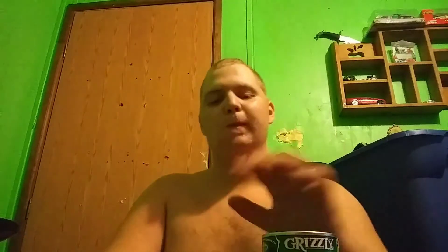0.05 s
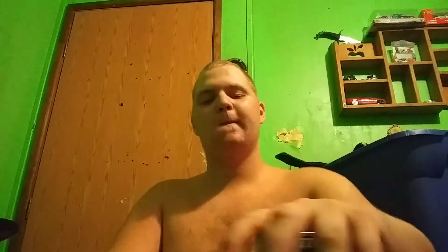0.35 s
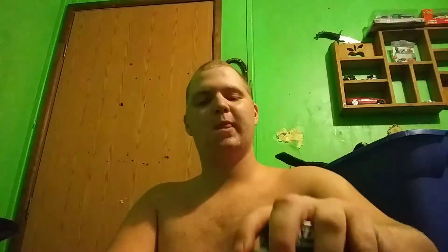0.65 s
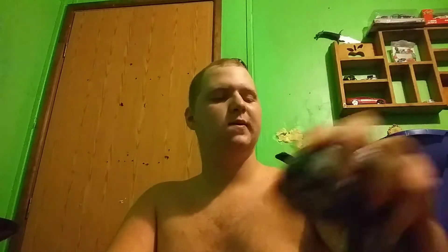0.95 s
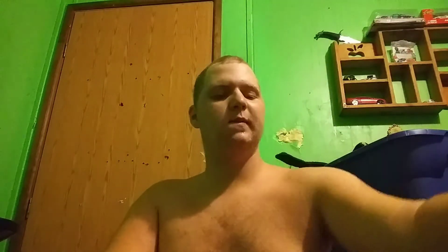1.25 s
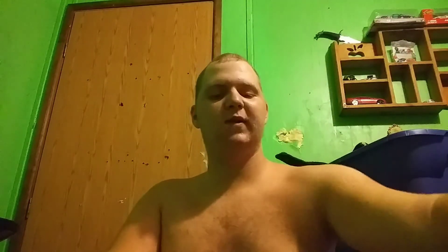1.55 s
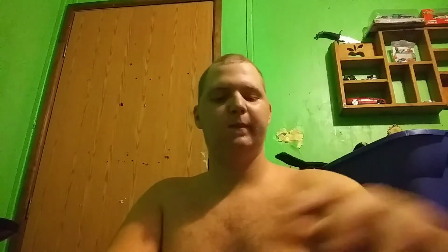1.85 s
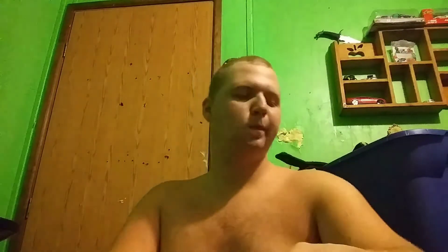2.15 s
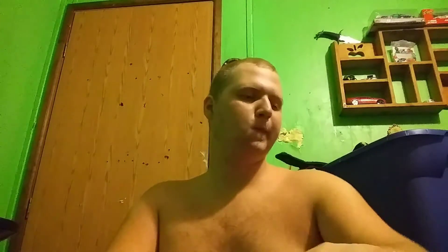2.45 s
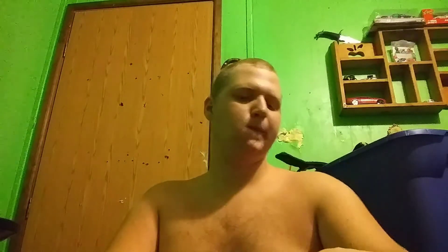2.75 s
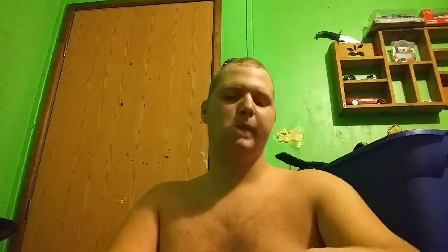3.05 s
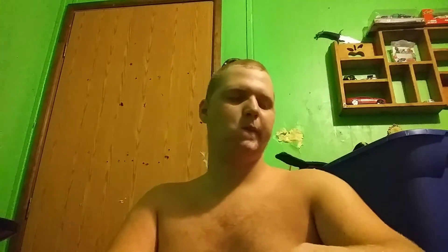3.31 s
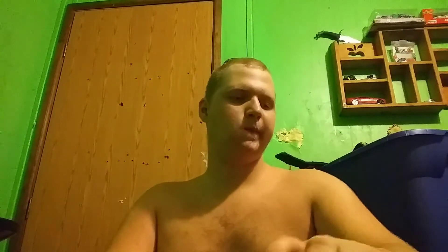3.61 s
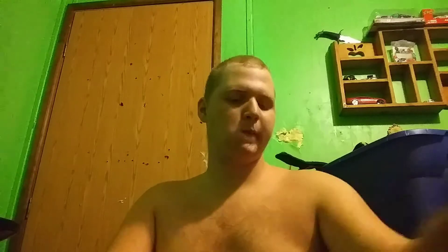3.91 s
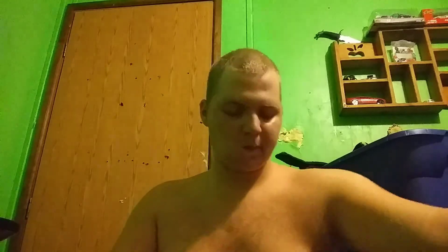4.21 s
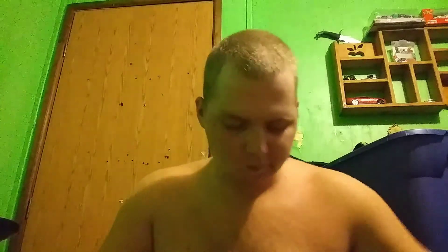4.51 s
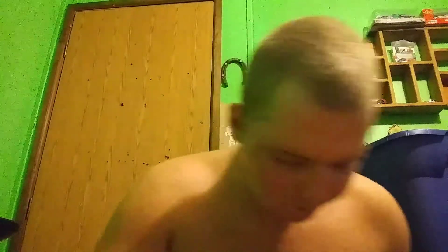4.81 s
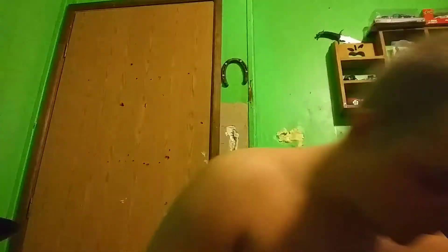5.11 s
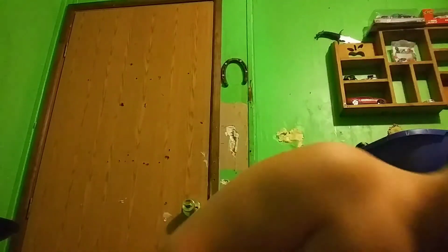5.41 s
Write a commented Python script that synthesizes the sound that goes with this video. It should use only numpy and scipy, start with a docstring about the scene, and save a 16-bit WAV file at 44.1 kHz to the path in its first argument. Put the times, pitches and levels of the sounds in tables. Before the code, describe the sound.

A small tin can is handled on a desk right next to the microphone in a small room. A sharp knock opens, then comes a quick, loud clatter of tinny clicks and scuffs with dull desk thumps. After a few softer taps, the can slides faintly and clicks down. One very hard knock follows later, and then someone shifts with a soft rustle over faint hiss.

```python
"""At a desk in a small room, close to a microphone, a small tin can is knocked about, lifted and set down.
Each impact excites damped modes of its wall and lid, and the desk thumps under the can and the hand.
Friction sounds as fingers rub the can and, once, as it slides across the top. The hardest knocks
overload the recorder; between them are faint hiss and the rustle of someone shifting."""
import sys
import numpy as np
from scipy import signal
from scipy.fft import rfft, irfft
from scipy.io import wavfile
from scipy.ndimage import uniform_filter1d

SR = 44100
rng = np.random.default_rng(int(sys.argv[2]) if len(sys.argv) > 2 else 0)


def transcribe(u):
    """Save the signal u as a 16-bit wav file named by the first command-line argument.

    u: samples, shape (n,) or (channels, n), limited to [-1, 1]; the rate is SR.
    q: integer samples, one column per channel.
    """
    v = np.clip(np.atleast_2d(u).T, -1, 1)
    q = np.round(v * 32767).astype(np.int16)
    wavfile.write(sys.argv[1], SR, q)


N = 240992
TIME = np.arange(N) / SR


# Impacts of the can:
# (time [s], relative level [dB], bass [dB], treble [dB], wall resonance [Hz], room send [dB])
KNOCKS = [ (0.068, 0.5, 9, -3.5, 685, -9.5), (0.085, -2.5, -4, -9, 1076, -6),
          (0.182, -31.5, 5, -7.5, 646, -9), (0.228, -28, -12, -2.5, 1090, -8),
          (0.502, -1.5, -4, 7.5, 1404, 4), (0.671, 2, -5, 3.5, 800, 2.5), (0.791, -1, -9.5, 2.5, 1040, 3),
          (0.800, -4.5, -28, 0, 770, 3.5), (0.809, 6, -5.5, 1, 1330, -25),
          (0.821, -3.5, 3, 2.5, 917.4, 1.5), (0.856, -5, 6.5, -3.5, 1228, 0),
          (0.901, -13.5, 1, -15, 990, -3), (0.912, 0.5, -7, -1.5, 1080, -8), (0.925, -5, 0, -13, 946, -3),
          (0.944, -5, -2, -10, 1080, -10.5), (1.163, 1, -3, -11, 962, -7),
          (1.354, -24.5, -3, -11, 2320, -5.5), (1.3746, -15.5, 6.5, -6, 1500, -7.5),
          (1.928, -23, 14, -9, 1600, -5.5), (1.959, -38, 9, 9.5, 2400, -8.5),
          (2.795, -11, -6.5, -8.5, 946, -11.5), (2.805, -12, -7.5, -1.5, 970, -13.5),
          (3.7149, -8, -13, -8, 1099, -1.5), (3.7455, 7, -5, -37, 1435, -13),
          (3.748, 10, 2.5, -1.5, 1498, -7.5), (3.844, -12.5, -4.5, -7.5, 1200, -8),
          (3.897, -23.5, 13.5, -8.5, 1000, -16)]

def knocks(skid_s=0.0058, chatter_s=0.0067, chatter_db=-5, touch_db=-3):
    """Impact excitation: a touch, a skid and lid chatter sum to one force. Yields (time, sound, send)."""
    t = TIME[:8192]
    for start, db, bass_db, treble_db, wall_hz, room_db in KNOCKS:
        skid = slips(len(t), spread_db=4) * np.exp(-t / skid_s)
        chatter = rng.standard_normal(len(t)) * np.sqrt(t) * np.exp(-2 * t / chatter_s)
        force = unit_energy(skid) + gain_of(chatter_db) * unit_energy(chatter)
        force[0] += gain_of(touch_db)
        pulse = contact_pulse(bass_db, treble_db, wall_hz)
        yield start, gain_of(db) * signal.fftconvolve(force, pulse), room_db


# Brief drags of the can or hand:
# (time [s], relative level [dB], bass [dB], treble [dB], wall resonance [Hz], decay time [s])
SCUFFS = [ (0.002, -16.5, 7, 7, 1010, 0.03), (0.037, -16, 11.5, -17, 650, .025),
          (0.151, -28.5, 0, 1.5, 960, .022), (0.470, 0, -2.5, 5, 1260, .024),
          (0.678, 2.5, 0, 14.5, 763, .021), (2.327, -33, 11.5, 2.5, 800, 0.017),
          (2.722, -25, 11.5, -23, 920, .056), (2.789, -9, -7, -0.5, 1004, 0.0096),
          (3.027, -32, 22, 10, 1070, 0.06), (3.85, -15.5, 6.5, -5.5, 1046, 0.01),
          (4.576, -32, 17.5, 20, 676, .011), (5.034, -30.5, 20, 3.5, 760, 0.012),
          (5.324, -44.5, 12, -19, 423, 0.037), (5.37, -40.5, -7, -10, 2450, 0.011)]

def scuffs(rise_share=0.092, room_db=1.5):
    """Transient friction: a burst of slips swells and decays. Yields (time, sound, send)."""
    t = TIME[:8192]
    for start, db, bass_db, treble_db, wall_hz, decay_s in SCUFFS:
        envelope = (1 - np.exp(-t / (rise_share * decay_s))) * np.exp(-t / decay_s)
        force = unit_energy(slips(len(t), spread_db=4) * envelope)
        pulse = contact_pulse(bass_db, treble_db, wall_hz, lid_hz=wall_hz)  # dragging sharpens the ring
        yield start, gain_of(db) * signal.fftconvolve(force, pulse), room_db


# Spectrum of a contact: (frequency [Hz], relative level [dB])
CONTACT_SPECTRUM = [(30, -23), (100, -16.5), (250, -11), (500, -2), (900, -2.5), (1500, -1), (2200, -5),
                    (3500, -11), (5500, -16), (7000, -22), (8500, -36.5), (12000, -48.5), (16000, -57.5)]

def contact_pulse(bass_db, treble_db, wall_hz, lid_hz=2665, wall_db=10, lid_db=3, delay_s=0.001097):
    """Dispersion: bending waves in thin sheet travel faster at high frequency, spreading the click."""
    size = 4096
    signed_hz = np.fft.fftfreq(size, 1 / SR)
    hz = abs(signed_hz) + 1
    db = value_at(CONTACT_SPECTRUM, hz)
    db += bass_db / (1 + (hz / 420) ** 4) + treble_db / (1 + (2600 / hz) ** 4)
    db += wall_db / (1 + (np.log2(hz / wall_hz) / 0.35) ** 2)  # half-widths in octaves
    db += lid_db / (1 + (np.log2(hz / lid_hz) / 0.086) ** 2)
    log_spectrum = np.conj(signal.hilbert(np.log(gain_of(db))))  # minimum phase keeps the pulse causal
    lag = 4 * np.pi * delay_s * np.sign(signed_hz) * np.sqrt(hz * wall_hz)
    pulse = np.fft.ifft(np.exp(log_spectrum - 1j * lag)).real[:size // 2]
    return pulse / abs(pulse).max()


# Modes of the can and the desk under it: (frequency [Hz], relative level [dB], 60 dB decay time [s])
CAN_MODES = [(146, -36, 0.73), (266, -28.5, 0.17), (334, -33, 0.3), (377, -32.5, 0.17), (553, -26, 0.14),
             (670, -28, 0.16), (762, -28.5, 0.012), (934, -25.5, 0.26), (1040, -31.5, 0.12),
             (1215, -31, 0.028), (1210, -36.5, 0.015), (1414, -29, 0.085), (1668, -27, 0.16),
             (1650, -27, 0.012), (2210, -28.5, .07), (2400, -26, 0.3), (2503, -23, 0.12),
             (2950, -30, 0.012), (3200, -20, 0.02)]

def can(contacts, ring_db=-28):
    """Modal superposition: each contact is heard directly and through the damped modes it excites."""
    t = TIME[:SR // 2]
    response = gain_of(ring_db) * sum(gain_of(db - 60 * t / t60) * np.cos(2 * np.pi * hz * t)
                                      for hz, db, t60 in CAN_MODES)
    response[0] += 1
    return signal.fftconvolve(contacts, response)[:N]


# Pushes of the hand on the desk: (time [s], level [dB], initial frequency [Hz], final frequency [Hz])
HAND_BUMPS = [(0.087, -23, 172, 162), (0.679, -29.5, 129, 115), (0.965, -28.5, 361, 333),
              (1.385, -37, 446, 442), (1.571, -47, 113.2, 100.3), (1.726, -48.5, 271.7, 257),
              (1.78, -47, 428, 424), (1.994, -47, 107, 100), (2.327, -35, 203, 116),
              (2.977, -34.5, 195, 126), (3.05, -44, 213, 185), (3.848, -28, 333, 305),
              (4.577, -39.5, 265.3, 257), (5.334, -44.5, 272, 261)]

def desk_thumps(rise_s=0.011, settle_s=0.017, knock_db=-29.5, knock_hz=(273, 251)):
    """Damping: the desk's higher vibration dies first, so each thump of hand or can sags in pitch."""
    out, t = np.zeros(N), TIME[:SR // 4]
    under_knocks = [(start, db + bass_db + knock_db, *knock_hz) for start, db, bass_db, *_ in KNOCKS]
    envelope = t / rise_s * np.exp(1 - t / rise_s)
    for start, db, initial_hz, final_hz in HAND_BUMPS + under_knocks:
        cycles = np.cumsum(final_hz + (initial_hz - final_hz) * np.exp(-t / settle_s)) / SR
        unevenness = uniform_filter1d(uniform_filter1d(rng.standard_normal(len(t)), size=160), size=20)
        pressure = 1 + 0.3 * unit_rms(unevenness)
        add(out, start, gain_of(db) * pressure * envelope * np.sin(2 * np.pi * cycles))
    return out


# Envelope of the sliding can: (time [s], relative level [dB])
SLIDE_ENVELOPE = [(2.38, -51), (2.396, -57.5), (2.458, -36.5), (2.506, -39), (2.528, -30.5), (2.608, -40.5),
                  (2.652, -34), (2.734, -53), (2.74, -59)]
# Its spectrum: (frequency [Hz], relative level [dB])
SLIDE_SPECTRUM = [(88, -55), (150, -35), (468, -10.5), (556, -9.5), (936, -2.5), (1050, -3.5), (1320, -1),
                  (2020, -3), (2180, 2), (2920, -4), (5610, -3.5), (15000, -49)]

def slide(fine_slips, db=-3.5):
    """Sliding friction: fine slips between can and desk merge into a scrape."""
    return gain_of(db) * envelope_of(SLIDE_ENVELOPE) * shaped(fine_slips, SLIDE_SPECTRUM)


# Envelope of fingers rubbing the lifted can: (time [s], relative level [dB])
GRIP_ENVELOPE = [(.93, -42.5), (1.0, -52.5), (1.08, -58), (1.45, -66.5)]
# Its spectrum: (frequency [Hz], relative level [dB])
GRIP_SPECTRUM = [(300, -29), (1500, 10.5), (3000, -0.5), (5500, 7), (7000, -2.5), (9000, -10.5),
                 (15000, -33)]

def grip(fine_slips, db=1.5):
    """Friction of skin on metal: fine slips make a bright, fading rub."""
    return gain_of(db) * envelope_of(GRIP_ENVELOPE) * shaped(fine_slips, GRIP_SPECTRUM)


# Envelope of someone shifting: (time [s], level [dB])
RUSTLE_ENVELOPE = [(4.3, -76.5), (4.37, -61), (4.6, -50), (4.68, -62), (5.1, -64), (5.18, -87)]
# Its spectrum: (frequency [Hz], relative level [dB])
RUSTLE_SPECTRUM = [(29, -57), (50, -23), (242, -6), (307, -11.5), (919, -13), (1010, -14.5), (1310, -14),
                   (3670, -33), (4230, -24.5), (15000, -58)]

def rustle():
    """Coarse friction: a shifting body makes slips of widely varying size."""
    return envelope_of(RUSTLE_ENVELOPE) * shaped(slips(N, spread_db=7), RUSTLE_SPECTRUM)


# Early reflections from nearby surfaces: (delay [s], relative amplitude [1])
REFLECTIONS = [(.0032, 0.26), (.0058, -.25), (.0093, 0.27), (0.0126, 0.11), (0.019, -0.18)]
# Reverberation time: (frequency [Hz], 60 dB decay time [s])
REVERB_TIMES = [(100, 0.24), (400, 0.29), (1000, 0.22), (2800, 0.27), (7000, 0.23), (15000, 0.16)]
# Spectral weighting by the room's walls: (frequency [Hz], gain [dB])
WALL_RESPONSE = [(60, 1.5), (250, -0.5), (1000, 1.5), (2500, -3.5), (4500, 0), (9000, 1), (15000, 2.5)]

def room(sound, build_s=0.0046, echo_db=-4, tail_db=-1):
    """Reverberation: discrete reflections lead into a diffuse tail, each band decaying at its own rate."""
    hz, t, bands = signal.stft(rng.choice([-1., 1.], SR), SR, nperseg=256)
    decay = gain_of(-60 * t / value_at(REVERB_TIMES, hz)[:, None])
    tail = signal.istft(bands * decay, SR, nperseg=256)[1][:SR]
    tail *= 1 - np.exp(-(TIME[:SR] / build_s) ** 2)
    response = gain_of(tail_db) * unit_energy(tail)
    for delay, gain in REFLECTIONS:
        add(response, delay, np.array([gain * gain_of(echo_db)]))
    wall_gain = gain_of(value_at(WALL_RESPONSE, np.arange(SR // 2 + 1)))
    return signal.fftconvolve(sound, irfft(rfft(response) * wall_gain))[:N]


# Spectrum of the background: (frequency [Hz], relative level [dB])
HISS_SPECTRUM = [(18, -42.5), (30, -8), (244, 0.5), (402, -2.5), (698, -8), (1060, -10.5), (1180, -11),
                 (1310, -11), (2330, -16), (3830, -17.5), (4860, -17), (6480, -17.5), (7990, -29.5),
                 (15800, -35.5)]
# Lulls in it: (start [s], end [s])
HISS_LULLS = [(0.337, 0.475), (1.665, 1.708), (2.083, 2.138), (2.195, 2.25), (3.25, 3.268), (3.308, 3.37),
              (3.615, 3.69), (4.065, 4.185), (4.292, 4.314), (5.18, 5.26), (5.43, 5.5)]

def hiss(db=-57.5, lull_db=19.5, fade_s=0.035):
    """Amplitude modulation: steady broadband noise sinks away in short lulls."""
    dip = sum(np.clip(0.5 + np.minimum(TIME - start, end - TIME) / fade_s, 0, 1)
              for start, end in HISS_LULLS)
    return gain_of(db - lull_db * dip) * shaped(rng.standard_normal(N), HISS_SPECTRUM)


def slips(count, spread_db):
    """Friction noise: tiny slips with a log-normal spread of sizes, at rms 1."""
    slip, size = rng.standard_normal((2, count))
    return unit_rms(slip * gain_of(spread_db * size))


def shaped(x, spectrum):
    """Linear filtering by a (frequency [Hz], level [dB]) curve, scaled to rms 1."""
    gain = gain_of(value_at(spectrum, np.fft.rfftfreq(N, 1 / SR)))
    return unit_rms(irfft(rfft(x) * gain, N))


def value_at(table, hz):
    """Interpolation on a logarithmic frequency axis."""
    frequencies, values = np.transpose(table)
    return np.interp(np.log(hz + 1), np.log(frequencies), values)


def envelope_of(curve):
    """Amplitude envelope of a (time [s], level [dB]) curve, silent outside it."""
    times, db = np.transpose(curve)
    return gain_of(np.interp(TIME, times, db, left=-np.inf, right=-np.inf))


def gain_of(db):
    """Amplitude ratio of a level in decibels."""
    return 10 ** (np.asarray(db) / 20)


def unit_rms(x):
    """Normalisation to a mean square of 1."""
    return x / np.sqrt(np.mean(x ** 2) + 1e-20)


def unit_energy(x):
    """Normalisation to a sum of squares of 1."""
    return x / np.linalg.norm(x)


def add(mix, start, sound):
    """Superposition of a sound from a start time in seconds."""
    part = mix[max(round(start * SR), 0):][:len(sound)]
    part += sound[:len(part)]


def scene(path_count=4):
    """Superposition: the direct sound of can, desk and friction, their reverberation, and the hiss."""
    direct, paths = np.zeros(N), np.zeros((path_count, N))
    contacts = sorted([*knocks(), *scuffs()], key=lambda contact: contact[0])
    for k, (start, sound, room_db) in enumerate(contacts):
        add(direct, start, sound)
        # the can keeps moving, so successive contacts reach the room by different paths
        add(paths[k % path_count], start, gain_of(room_db) * sound)
    fine_slips = slips(N, spread_db=3.5)
    friction = slide(fine_slips) + grip(fine_slips) + rustle()
    thumps = desk_thumps()
    reverberation = sum(room(can(path)) for path in paths) + room(friction + gain_of(-9.5) * thumps)
    return (can(direct) + thumps + friction + reverberation + hiss())[None]


def record(dry, threshold_db=-4, release_db_per_s=350, reduction=0.29, attack_s=0.002, band_hz=(60, 15900)):
    """Overload: a limiter lowers the hardest knocks, whose first cycles outrun it and clip; band limits follow."""
    over_db = np.maximum(20 * np.log10(abs(dry[0]) + 1e-9) - threshold_db, 0)
    fall_db = TIME * release_db_per_s
    held_db = np.maximum.accumulate(over_db + fall_db) - fall_db
    pole = np.exp(-1 / (attack_s * SR))
    limited = dry / gain_of(reduction * signal.lfilter([1 - pole], [1, -pole], held_db))
    clipped = limited / (1 + (limited / 0.89) ** 10) ** 0.1  # soft ceiling at 0.89
    high_passed = signal.lfilter(*signal.butter(1, band_hz[0], "high", fs=SR), clipped)
    low_pass = signal.firwin(511, band_hz[1], window=("kaiser", 9), fs=SR)
    return signal.oaconvolve(high_passed, low_pass[None], "same")


dry = scene()
out = record(dry)
transcribe(out)
```